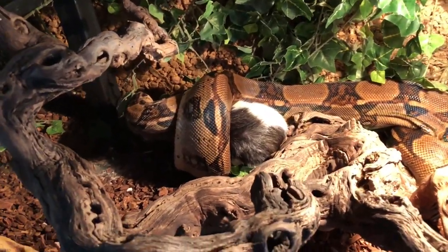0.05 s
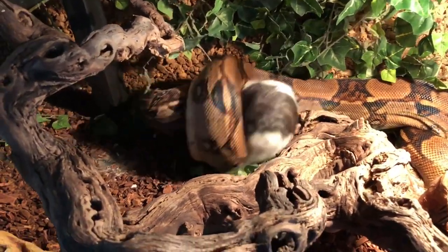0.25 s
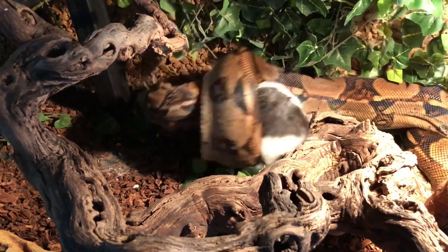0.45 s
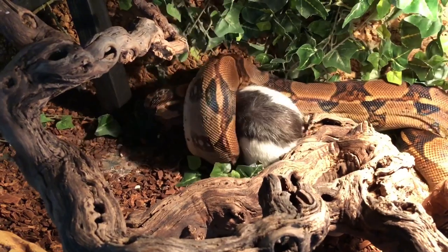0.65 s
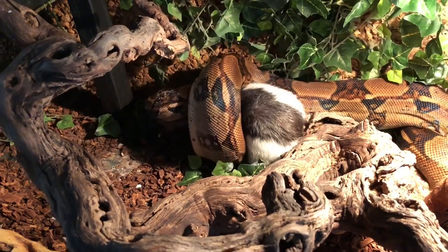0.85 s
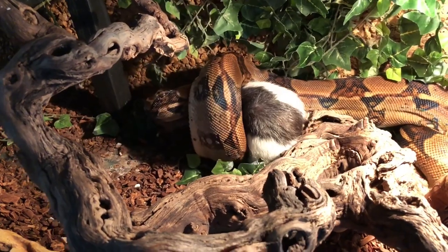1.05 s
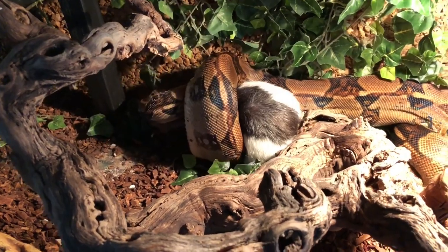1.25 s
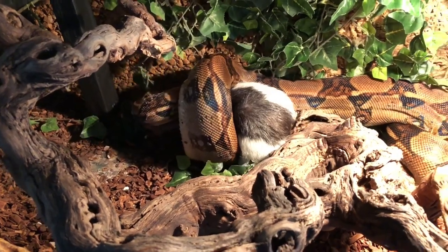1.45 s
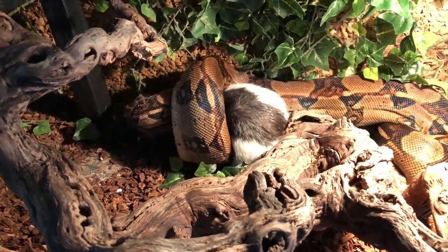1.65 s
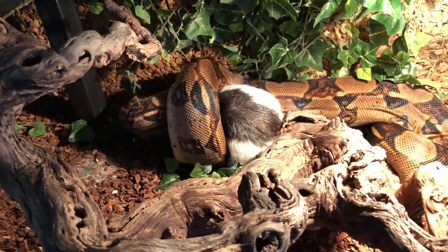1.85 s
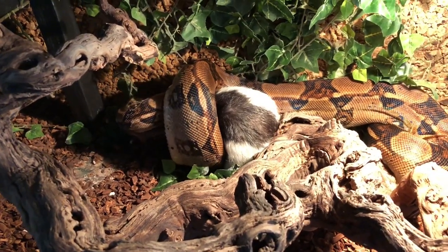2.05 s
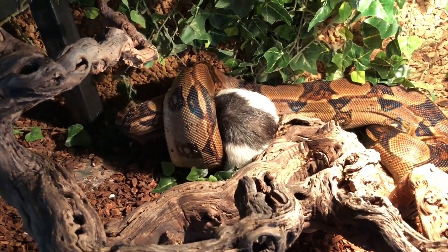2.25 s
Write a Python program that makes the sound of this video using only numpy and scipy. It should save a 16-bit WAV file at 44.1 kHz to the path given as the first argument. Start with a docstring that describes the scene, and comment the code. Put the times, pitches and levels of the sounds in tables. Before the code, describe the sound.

Crunchy rustling of a snake rolling over bark bedding, with snaps and thumps, then faint ticks.

```python
"""In a terrarium, close up, a large snake tightens its coils round its prey and rolls over.
Bark chips and leaves scrape, crunch and snap under it, and its weight thumps the hollow enclosure.
Then it lies nearly still: the bedding settles with small ticks over a quiet room."""
import sys
import numpy as np
from scipy import signal
from scipy.fft import rfft, irfft, next_fast_len
from scipy.io import wavfile
from scipy.ndimage import map_coordinates

SR = 44100
rng = np.random.default_rng(int(sys.argv[2]) if len(sys.argv) > 2 else 0)


def store_wav(level_fs):
    """Save 16-bit WAV to argv[1]."""
    pcm = np.round(np.clip(np.atleast_2d(level_fs), -1, 1) * 32767)
    wavfile.write(sys.argv[1], SR, pcm.T.astype(np.int16))


N = 101429


def amp(db):
    """Decibels to gain."""
    return 10 ** (np.asarray(db) / 20)


def unit(x):
    """Scale to rms 1."""
    return x / np.sqrt(np.mean(x ** 2) + 1e-20)


def along(points, hz):
    """Read (frequency, value) points on a log frequency axis."""
    freqs, values = np.transpose(points)
    return np.interp(np.log(hz + 1), np.log(freqs + 1), values)


def faders(rows, outside=-100):
    """A dB curve for each column after the time; outside=None holds the end levels."""
    times, *columns = np.transpose(rows)
    return [np.interp(np.arange(N) / SR, times, db, outside, outside) for db in columns]


def wobble(rate):
    """A smooth random curve, rate knots a second."""
    return map_coordinates(rng.standard_normal(int(N * rate / SR) + 4), [np.arange(N) * rate / SR])


def filtered(x, response):
    """Filter x by a gain that depends on frequency."""
    size = next_fast_len(N + SR // 2)
    return irfft(rfft(x, size) * response(np.fft.rfftfreq(size, 1 / SR)), size)[:N]


def coloured(x, eq):
    """x through an EQ curve, at rms 1."""
    return unit(filtered(x, lambda hz: amp(along(eq, hz))))


def add(track, start_s, sound):
    """Mix a sound into the track."""
    part = track[max(round(start_s * SR), 0):][:len(sound)]
    part += sound[:len(part)]


def grains(per_s, spread_db, life_s, bed):
    """Tiny noise bursts of random size, one per slipping chip, over a smooth bed of friction."""
    chance, size, noise = rng.random(N), rng.random(N), rng.standard_normal(N)
    slips = (chance < per_s / SR) * amp(-spread_db * np.log(size + .02)) ** 2
    power = signal.lfilter([1], [1, -np.exp(-1 / (life_s * SR))], slips)
    return noise * np.sqrt(power / (power.mean() + 1e-20) + bed)


def ring(modes, attack_s, scatter_db, length=1):
    """Damped modes after one blow, peak 1; length scales their decay times."""
    t = np.arange(SR // 2) / SR
    tone = np.zeros(len(t))
    for hz, db, t60 in modes:
        struck_db = db + scatter_db * rng.standard_normal()
        tone += amp(struck_db - 60 * t / (t60 * length)) * np.sin(2 * np.pi * hz * t)
    tone *= 1 - np.exp(-t / attack_s)
    return tone / np.abs(tone).max()


def clacks(per_s, centre_hz, spread_octaves, t60_cycles, spread_db):
    """Loose chips hit each other, each ringing briefly at its own pitch; rms 1."""
    when, pitch, size = rng.random((int(per_s * N / SR), 3)).T
    hz = centre_hz * 2 ** (spread_octaves * (2 * pitch - 1))
    n = np.arange(SR // 80)
    cycles = hz[:, None] * n / SR
    gain = amp(-spread_db * np.log(size + .03))[:, None]
    pings = gain * amp(-60 * cycles / t60_cycles) * np.sin(2 * np.pi * cycles)
    positions = (when * N).astype(int)[:, None] + n
    return unit(np.bincount(positions.ravel(), pings.ravel(), N)[:N])


# Fader ride of the roll, before trims (time [s], scrape level [dB], crunch level [dB])
ROLL_RIDE = [(0.15, -76, -74), (0.18, -56.5, -61), (0.197, -55, -52), (0.208, -51.5, -60.5),
             (0.248, -46.5, -54), (0.275, -46.5, -48.5), (0.297, -51.5, -53.5), (0.308, -38, -33.5),
             (0.328, -41.5, -42), (0.341, -33.5, -37), (0.351, -36.5, -32.5), (0.359, -36, -32),
             (0.37, -45, -47), (0.486, -44.5, -43.5), (0.502, -42, -43.5), (0.514, -50, -50),
             (0.596, -40.5, -40.5), (0.612, -44, -48.5), (0.629, -38, -36.5), (0.64, -41, -42.5),
             (0.694, -49, -52.5), (0.75, -50.5, -53.5), (0.856, -66, -76), (0.902, -67, -66),
             (0.95, -82, -84)]
# Dull body of the scrape (frequency [Hz], gain [dB])
SCRAPE_EQ = [(100, -18), (250, -3.5), (450, -3.5), (700, -1.5), (1000, -2), (1500, -7.5), (2300, -13.5),
             (4000, -12), (10000, -43)]
# Crisp edge of the crunch (frequency [Hz], gain [dB])
CRUNCH_EQ = [(700, -18), (1600, -5.5), (2500, -9.5), (3500, -0.5), (5000, -2), (6500, -6), (8500, -5),
             (10500, -11), (15500, -13)]


def rolling_coils(scrape_trim_db=-0.15, crunch_trim_db=-1.5, clack_trim_db=-9.5):
    """The coils drag over the bedding: a dull scrape, a bright crunch and clacking chips."""
    scrape_db, crunch_db = faders(ROLL_RIDE)
    scrape = coloured(grains(per_s=570, spread_db=2.0, life_s=0.0017, bed=0.3), SCRAPE_EQ)
    crunch = coloured(grains(per_s=1300, spread_db=3.6, life_s=0.0006, bed=0.4), CRUNCH_EQ)
    clatter = clacks(per_s=420, centre_hz=4015, spread_octaves=1.264, t60_cycles=41, spread_db=3.0)
    return (amp(scrape_db + scrape_trim_db) * scrape
            + amp(crunch_db + crunch_trim_db) * crunch
            + amp(crunch_db + clack_trim_db) * clatter)


# Fader ride of the slow creep, before trim (time [s], level [dB])
CREEP_RIDE = [(0, -80), (.055, -70.5), (.11, -78), (.9, -70.5), (1.005, -64.5), (1.04, -68), (1.11, -75.5),
              (1.14, -64), (1.19, -72.5), (1.26, -64), (1.39, -73), (1.42, -63), (1.46, -75.5), (1.61, -71),
              (1.67, -74.5), (1.72, -67), (1.78, -75), (1.99, -75), (2.3, -77)]
# Soft, midrange tone of the creep (frequency [Hz], gain [dB])
CREEP_EQ = [(150, -8.5), (700, 3), (1300, 0), (2200, -9), (3700, -4.5), (6000, -14), (9000, -18.5),
            (15500, -34)]


def creeping_coils(trim_db=3.5):
    """The coils inch over the chips: a faint rustle, exposed once the roll dies away."""
    creep_db, = faders(CREEP_RIDE, outside=None)
    slips = grains(per_s=700, spread_db=3.5, life_s=0.001, bed=0.55)
    return amp(creep_db + trim_db) * coloured(slips, CREEP_EQ)


# Snap cues, pre-EQ (time [s], level [dB], pitch [Hz], width [octaves], relative splinter level [dB])
SNAP_CUES = [(0.127, -36, 3160, 0.69, -15), (0.129, -41, 5530, 0.091, -22), (.1672, -47.5, 5000, 0.28, -6),
             (0.214, -36, 1840, .2, -2), (.2485, -33, 2730, 0.64, -12), (0.31, -23, 4700, 1.8, -10),
             (0.3204, -23, 4270, 0.68, -14), (0.3567, -22.5, 6200, 0.95, -11),
             (0.4155, -31, 7000, 0.5, -15), (.4285, -30, 3360, 0.29, -11), (0.4446, -29, 7000, 1.3, -10),
             (0.5003, -11.5, 8130, 0.27, -17), (0.5355, -32.5, 4300, 0.79, -5),
             (0.5545, -30, 5040, 0.26, -15), (.593, -31, 6900, 0.39, -9), (0.6269, -23, 6020, 1.8, -12),
             (.678, -35.5, 4470, 0.14, -3), (0.8035, -46, 4100, 0.33, -3), (.875, -46.5, 7500, 1.3, -4),
             (0.9642, -52, 3450, 0.19, -9), (1.1477, -38, 4660, 0.95, -8.5),
             (1.5215, -46, 3550, 1.07, -4.5), (1.5933, -46.5, 3980, 0.78, -4),
             (1.7076, -52.5, 4460, 0.41, -6), (1.7217, -48.5, 4000, 0.32, -7), (1.741, -58, 4800, 0.32, -6),
             (1.969, -48, 4700, 1.1, -9), (2.0318, -49, 3870, 0.4, -17), (2.2815, -47, 6200, 1.4, -5)]
# Thin, bright tone shared by all snaps (frequency [Hz], gain [dB])
SNAP_EQ = [(800, -8), (2000, 0), (2600, -1), (3600, 0), (4500, 1), (8500, -2), (15500, -1.5)]


def snaps(crack_t60_s=0.0029, splinter_t60_s=0.031, ring_t60_s=0.02088, ring_db=-4):
    """Chips and leaves break: a sharp crack, a splintering tail and a faint woody ring."""
    out, t = np.zeros(N), np.arange(SR // 16) / SR
    for start_s, db, hz, octaves, splinter_db in SNAP_CUES:
        envelope = amp(-60 * t / crack_t60_s) + amp(splinter_db - 60 * t / splinter_t60_s)
        burst = envelope * rng.standard_normal(len(t))
        burst[0] += 2  # leading click
        crack = signal.lfilter(*signal.iirpeak(hz, 1 / (np.log(2) * octaves), SR), burst)
        high_cut = signal.butter(2, min(3.57 * hz, SR / 2.2), fs=SR, output="sos")
        crack = signal.sosfilt(high_cut, crack)
        add(out, start_s, amp(db) * crack / np.abs(crack).max())
        modes = [(hz * 2 ** (octaves * u), 0, ring_t60_s) for u in rng.uniform(-1.5, 1, size=4)]
        wood = ring(modes, attack_s=0.00029, scatter_db=2)
        add(out, start_s, amp(db + splinter_db + ring_db) * wood)
    return filtered(out, lambda hz: amp(along(SNAP_EQ, hz)))


# Dull, crunching knocks (time [s], level at the crest [dB], pitch [Hz], width [octaves])
KNOCK_CUES = [(0.1266, -57.5, 1180, 1.3), (.2475, -46, 720, 1), (0.3061, -40, 1290, 0.86),
              (.339, -33, 690, 0.71), (.353, -33, 630, 1.03), (.4445, -36.5, 795, 0.84),
              (.537, -40.5, 880, .6), (.593, -38.5, 950, 0.53), (.6275, -33.5, 790, 0.87),
              (1.261, -56.5, 1300, 0.93), (1.596, -62, 995, .25)]


def knocks(attack_s=0.00106, t60_s=0.04):
    """The body or a twig presses into packed bark, and many chips give way in one dull burst."""
    out, t = np.zeros(N), np.arange(SR // 6) / SR
    envelope = (1 - np.exp(-t / attack_s)) * amp(-60 * t / t60_s)
    crest = envelope.max() / np.sqrt(np.mean(envelope ** 2))
    for start_s, db, hz, octaves in KNOCK_CUES:
        edges_hz = [hz / 2 ** (octaves / 2), hz * 2 ** (octaves / 2)]
        band = signal.butter(2, edges_hz, "bandpass", fs=SR, output="sos")
        burst = signal.sosfilt(band, envelope * rng.standard_normal(len(t)))
        add(out, start_s, amp(db) * unit(burst) / crest)
    return out


# Weight landing on the floor (time [s], peak level [dB], ring length [x base decay])
THUMP_CUES = [(0.326, -40, 0.17), (.361, -32, 0.19), (0.5017, -31, 0.57), (0.588, -36.5, 0.36),
              (0.664, -26, 0.77), (0.715, -37, 0.51), (0.849, -48, 0.66), (1.146, -59.5, 1.1),
              (1.228, -57, 0.37), (1.716, -52.5, 0.38)]
# Boom of the enclosure (frequency [Hz], relative level [dB], base decay T60 [s])
ENCLOSURE_MODES = [(72, -1.5, 0.19), (100.9, 4, 0.37), (159.7, -1, 0.27), (180.8, -17, 0.57)]


def thumps():
    """The hollow enclosure booms under the snake's weight."""
    out = np.zeros(N)
    for start_s, db, length in THUMP_CUES:
        add(out, start_s, amp(db) * ring(ENCLOSURE_MODES, attack_s=0.0029, scatter_db=1, length=length))
    return out


# Fader ride of the shaking floor (time [s], level [dB])
RUMBLE_RIDE = [(.15, -74), (.22, -56), (.29, -50), (.335, -35), (.40, -48.5), (.47, -44), (.56, -49),
               (.65, -43), (.79, -56.5), (.90, -58.5), (.97, -62), (1.02, -65.5), (1.10, -69),
               (1.25, -70.5), (1.36, -83)]
# Low-end weight of the floor (frequency [Hz], gain [dB])
RUMBLE_EQ = [(22, -52), (36, -5.5), (55, -2), (95, 1.5), (135, -7.5), (180, 0.5), (240, -18), (500, -37.5)]


def floor_rumble():
    """The enclosure floor rumbles as the weight shifts."""
    rumble_db, = faders(RUMBLE_RIDE)
    return amp(rumble_db) * coloured(rng.standard_normal(N), RUMBLE_EQ)


# Light strokes on a leaf (centre time [s], level [dB], pitch [Hz])
BRUSH_CUES = [(1.009, -60.5, 5400), (2.063, -66, 4970)]


def brushes(half_length_s=0.017):
    """Scales slide along a leaf in short, soft swishes."""
    out, t = np.zeros(N), np.arange(N) / SR
    for centre_s, db, hz in BRUSH_CUES:
        swish = unit(signal.lfilter(*signal.iirpeak(hz, Q=2.4, fs=SR), rng.standard_normal(N)))
        out += amp(db) * np.exp(-((t - centre_s) / half_length_s) ** 2) * swish
    return out


# Tight reverb that hangs on in the bass (frequency [Hz], decay T60 [s])
WALL_DECAY = [(100, 0.59), (1000, 0.083), (10000, 0.09)]


def wall_echo(x, wet_db=-12):
    """The short answer of the enclosure's walls."""
    hz, t, spectrum = signal.stft(rng.standard_normal(SR // 2), SR, nperseg=256)
    decay = amp(-60 * t / along(WALL_DECAY, hz)[:, None])
    _, tail = signal.istft(spectrum * decay, SR, nperseg=256)
    return amp(wet_db) * signal.fftconvolve(x, tail / np.linalg.norm(tail))[:N]


# Dark bed of room air (frequency [Hz], gain [dB])
AIR_EQ = [(15, -55), (25, -11.5), (91, -3), (120, -7), (261, -4.5), (307, -6), (382, -10), (572, -10.5),
          (710, -11.5), (1120, -18.5), (1220, -21.5), (1430, -21), (5230, -25.5), (15800, -36)]
# Hum and whine (frequency [Hz], rms level [dB])
HUM_TONES = [(98, -83), (689, -77.5), (1200, -78)]


def room_tone(air_db=-64.5):
    """Quiet air noise with a faint, slightly unsteady hum and whine."""
    t = np.arange(N) / SR
    hum = sum(amp(db) * unit(np.sin(2 * np.pi * hz * t + 0.39 * wobble(5.04))) for hz, db in HUM_TONES)
    return hum + amp(air_db) * coloured(rng.standard_normal(N), AIR_EQ)


def scene():
    """The mono mix: bedding and floor rumble feed the echo; thumps and room tone stay dry."""
    near = rolling_coils() + creeping_coils() + floor_rumble() + snaps() + knocks() + brushes()
    return (near + wall_echo(near) + thumps() + room_tone())[None]


def record(dry, low_cut_hz=34.5, top_hz=15900):
    """The recorder cuts the deepest bass and keeps nothing above its band limit."""
    low_cut = signal.butter(4, low_cut_hz, "highpass", fs=SR, output="sos")
    return np.array([filtered(signal.sosfilt(low_cut, x), lambda hz: hz < top_hz) for x in dry])


dry = scene()
out = record(dry)
store_wav(out)
```